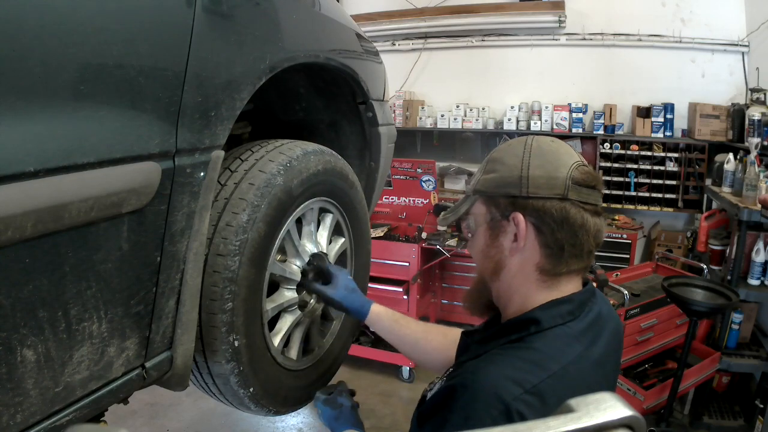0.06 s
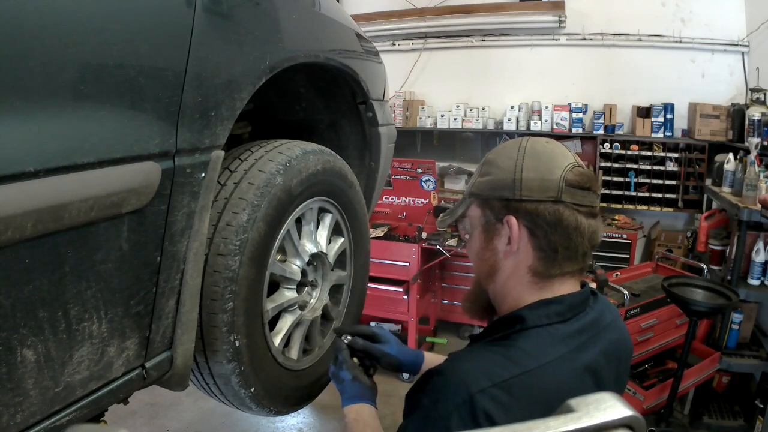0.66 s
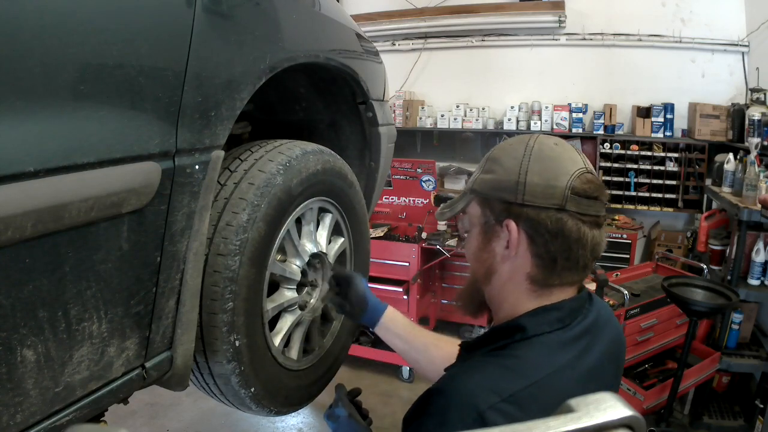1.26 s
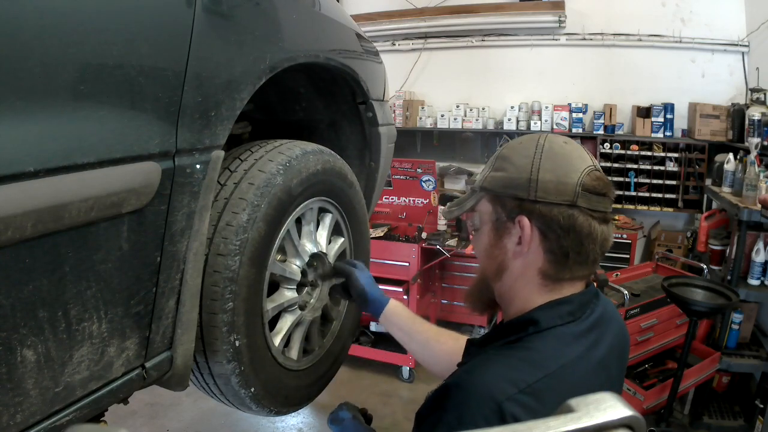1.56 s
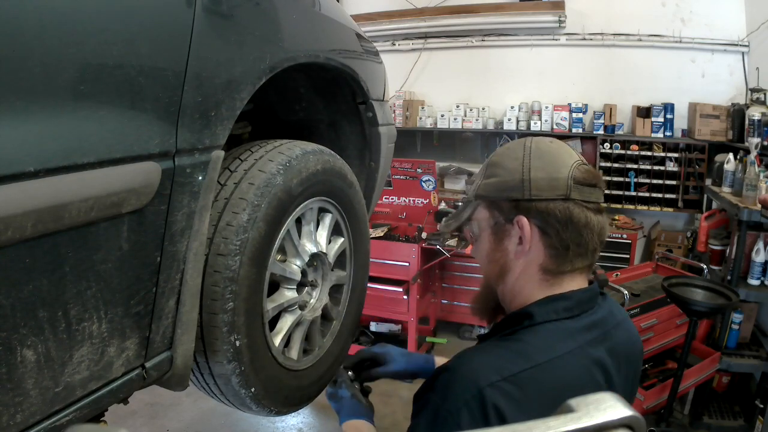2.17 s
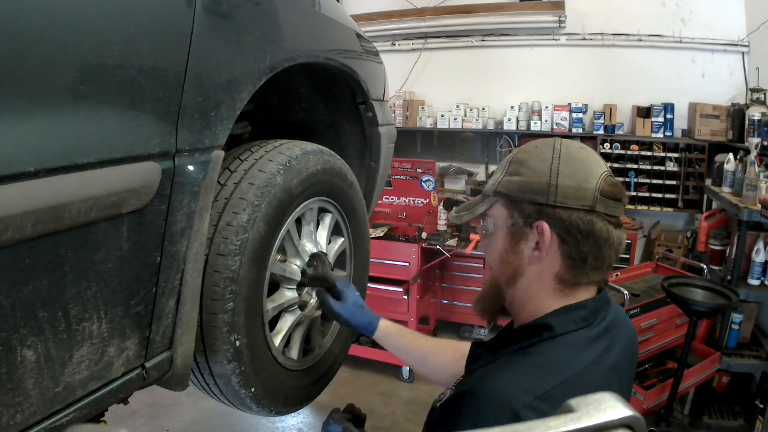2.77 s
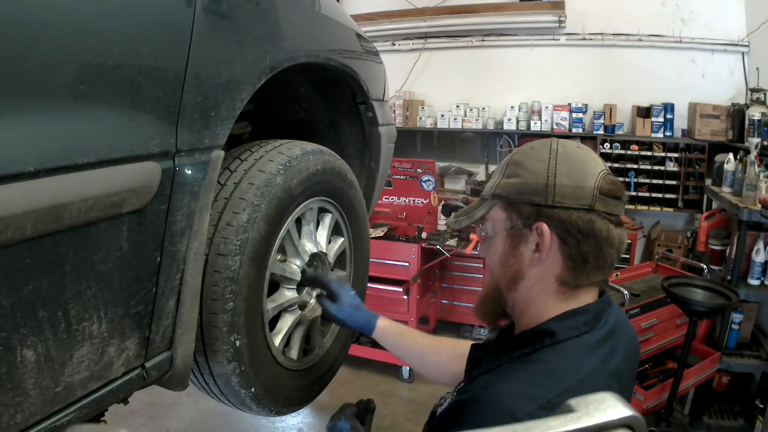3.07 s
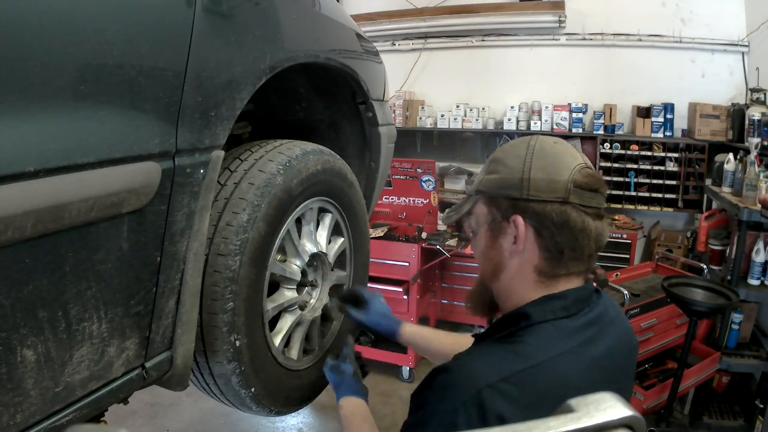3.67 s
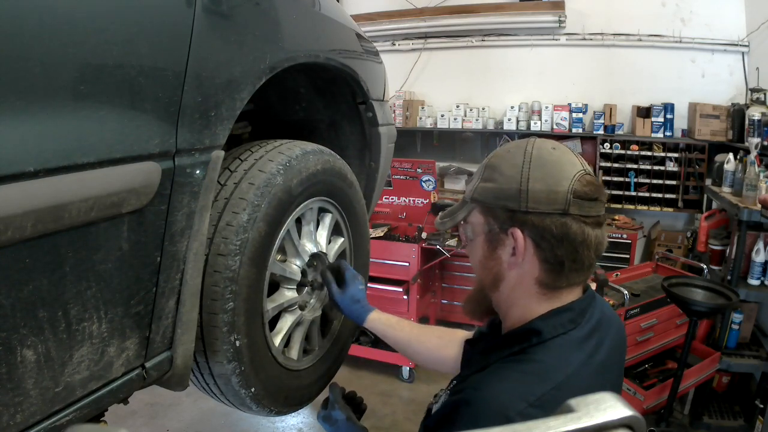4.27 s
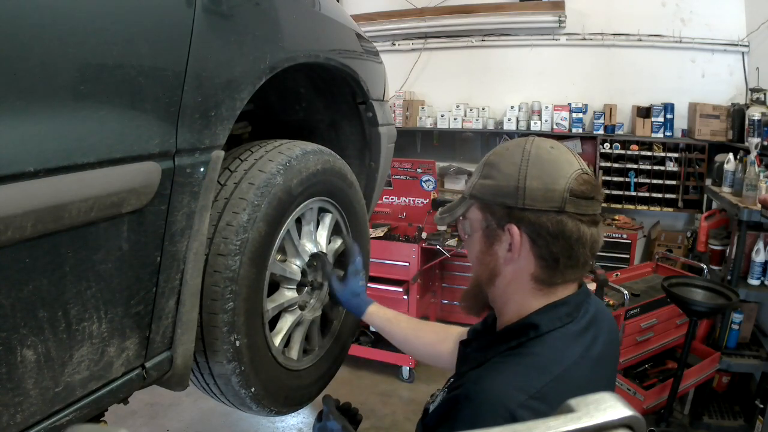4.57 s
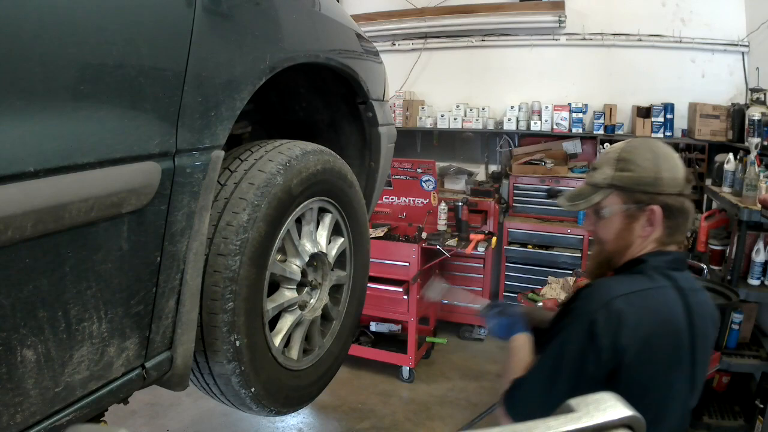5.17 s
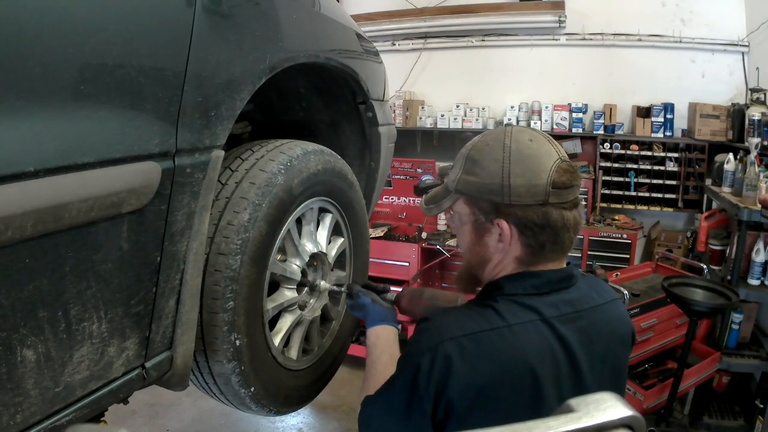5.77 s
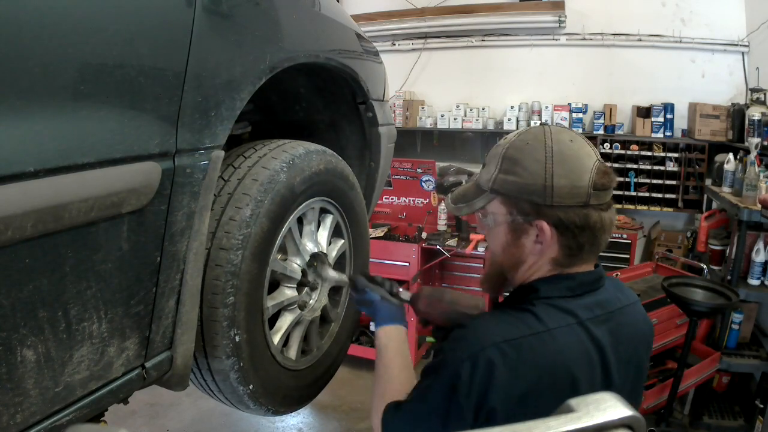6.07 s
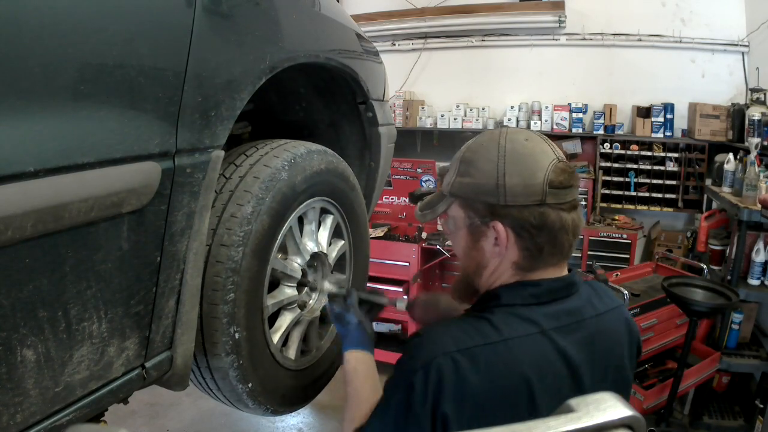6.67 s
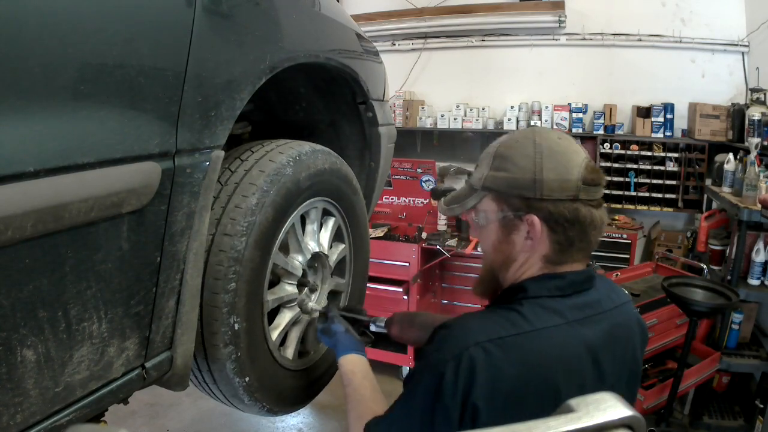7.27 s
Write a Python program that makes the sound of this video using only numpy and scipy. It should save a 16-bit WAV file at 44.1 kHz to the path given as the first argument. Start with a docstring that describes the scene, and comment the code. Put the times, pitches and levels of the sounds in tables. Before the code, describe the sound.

In a garage with a low background rumble, gloves rustle and steel lug nuts click, ring and scrape softly as they are threaded onto a car wheel by hand. The sound cuts out for an instant. A socket then clacks on and an air impact wrench fires five short, loud bursts of hammering, hiss and whine, with metal knocks between them. The tyre booms, the hard room echoes briefly and the close microphone overloads.

```python
"""Gloves rustle and steel clicks softly over a garage's low rumble: lug nuts go onto a car wheel by hand.
Each nut scrapes along its thread and ticks on its stud. The sound drops out for an instant; then a socket
clacks on and an air impact wrench fires five short bursts of hammer blows, exhaust and motor whine.
The blows ring socket and wheel, the tyre booms, the hard room answers and the close microphone overloads."""
import sys
import numpy as np
from scipy import signal
from scipy.fft import rfft, irfft
from scipy.io import wavfile
from scipy.ndimage import uniform_filter1d, map_coordinates

SR = 44100
rng = np.random.default_rng(int(sys.argv[2]) if len(sys.argv) > 2 else 0)


def digitize_waveform(pressure):
    """Quantize a signal to 16-bit integers and store it at the path in sys.argv[1].

    Rows of a 2-D input are taken as channels; values are limited to [-1, 1].
    """
    field = np.atleast_2d(pressure).T
    bounded = np.clip(field, -1, 1)
    quanta = np.round(bounded * 32767).astype(np.int16)
    wavfile.write(sys.argv[1], SR, quanta)


N = 322371
TIME = np.arange(N) / SR
CONTACT_RISE_S = .003

# trigger pulls: t/s, length/s, hammer/dB, wheel ring/dB, exhaust/dB, whine/Hz, whine/dB
TRIGGER_PULLS = [(5.577, 0.047, -1.5, -8.5, -1.5, 2426, -6), (5.683, 0.024, -3, -11.5, -5, 3734, -9),
                 (5.845, 0.063, 3, -16, -3.5, 2131, -7.5), (6.466, .082, -0.5, -19.5, -6, 3465, -14.5),
                 (7.126, 0.1, 1.5, -12.5, -5, 2151, -11)]
# the socket hits nuts and rim: t/s, clack/dB, knock/dB, hollow bore/dB, nut ring/dB
SOCKET_HITS = [(5.343, -22.5, -57, -24, -15.5), (5.474, -14, -57, -23, -6.5), (6.0825, -4, -18.5, -38, -36),
               (6.204, -25.5, -25.5, -49, -52), (6.3931, -14.5, -18, -28.5, -43),
               (6.7138, -13.5, -24.5, -46, -16), (6.9519, -34, -33.5, -48.5, -60),
               (7.0043, -28.5, -41, -35, -48), (7.035, -20, -24, -27, -43)]
# spectrum of the socket's steel-on-steel clack: f/Hz, level/dB
CLACK_SPECTRUM = [(200, 7.5), (1200, 9.5), (1800, 4), (2500, 7), (3500, 7), (4600, 2.5), (7000, -4.5),
                  (9500, -20), (13000, -74.5)]
# modes of a lug nut: f/Hz, t60/s, level/dB
LUG_NUT_MODES = [(2060, .2, -9.5), (2740, .12, -15), (3115, .25, 0), (3160, .22, -3), (3930, .14, -17),
                 (6874, .12, -23)]
# low rumble of shop and wheel: f/Hz, level/dB
RUMBLE_SPECTRUM = [(12, -27.5), (20, -4), (65, 3.5), (97, -4.5), (134, -0.5), (166, -11.5), (196, -14.5),
                   (264, -15.5), (296, -12.5), (400, -19), (520, -37.5), (880, -120)]


def amp(db):
    """Decibels to gain."""
    return 10 ** (np.asarray(db) / 20)


def unit(x):
    """Scale to rms 1."""
    return x / np.sqrt(np.mean(x ** 2) + 1e-20)


def fade(t, t60):
    """Exponential decay, 60 dB down after t60."""
    return np.exp(-np.log(1000) * t / np.maximum(t60, 1e-3))


def swell(start, attack, hold, t60):
    """An envelope that ramps up from start and begins to die away hold seconds after start."""
    t = TIME - start
    return np.clip(t / attack, 0, 1) * fade(np.maximum(t - hold, 0), t60)


def wobble(rate):
    """A smooth random curve with rate knots a second."""
    return map_coordinates(rng.standard_normal(int(N * rate / SR) + 4), [TIME * rate])


def along(points, hz):
    """Read (f/Hz, value) points on a log frequency axis."""
    freqs, values = np.transpose(points)
    return np.interp(np.log(hz + 1), np.log(freqs), values)


def add(track, start, x):
    """Mix x into the track from start seconds on."""
    part = track[round(start * SR):][:len(x)]
    part += x[:len(part)]


def colour(x, spectrum, size=2048):
    """Minimum-phase EQ under which white noise keeps its power."""
    gain = amp(along(spectrum, np.fft.rfftfreq(size, 1 / SR)))
    cepstrum = irfft(np.log(gain))
    cepstrum[1:size // 2] *= 2  # folding the cepstrum makes the filter causal
    cepstrum[size // 2 + 1:] = 0
    impulse = irfft(np.exp(rfft(cepstrum)))
    return signal.fftconvolve(x, impulse / np.linalg.norm(impulse))[:len(x)]


def noise(spectrum):
    """Steady coloured noise of rms 1."""
    return unit(colour(rng.standard_normal(N), spectrum))


def ring(modes, t):
    """Decaying modes at slightly varied strengths and fresh phases, starting near rms 1."""
    hz, t60, db = np.transpose(modes)[:, :, None]
    gain = amp(db + 1.5 * rng.standard_normal(db.shape))
    phase = 2 * np.pi * (hz * t + rng.random(db.shape))
    return np.sum(gain * fade(t, t60) * np.sin(phase), 0) / np.sqrt(np.sum(gain ** 2) / 2)


def crack(t, t60, spectrum, rise=CONTACT_RISE_S):
    """A hard contact: a burst of coloured noise with a fast attack and an exponential tail."""
    return colour(rng.standard_normal(len(t)) * fade(t, t60) * (1 - np.exp(-t / rise)), spectrum)


def rubbed(friction, modes):
    """Friction noise sings in the modes of a body."""
    body = ring(modes, np.arange(SR // 3) / SR)
    return signal.fftconvolve(friction, body / np.linalg.norm(body))[:len(friction)]


def in_garage(x, wet_db):
    """The direct sound plus the hard room's diffuse tail, which builds within milliseconds."""
    # reverb time of the garage: f/Hz, t60/s
    decay_times = [(70, 0.95), (200, 0.26), (800, 0.28), (3000, 0.34), (7000, 0.33), (12000, 0.53)]
    hz, t, bands = signal.stft(rng.standard_normal(SR * 3 // 4), SR, nperseg=256)
    envelope = fade(t, along(decay_times, hz)[:, None]) * (1 - np.exp(-t / .0011))
    room = signal.istft(bands * envelope, SR, nperseg=256)[1]
    room *= amp(wet_db) / np.linalg.norm(room)
    room[0] += 1  # direct path
    return signal.fftconvolve(x, room)


def shop_and_gloves():
    """A bed of rumble, air and hiss; each move of the hands swells it and adds grainy glove rustle."""
    # hands shift on the wheel: centre t/s, half length/s, rumble/dB, rustle/dB
    hand_moves = [(0.058, 0.055, -51, -68), (0.703, 0.044, -50, -70), (0.965, 0.027, -50, -72),
                  (2.38, 0.045, -47, -59), (3.03, 0.29, -51, -67), (3.168, 0.048, -39.5, -61.5),
                  (4.0, 0.18, -53, -63), (4.924, 0.15, -51.5, -56), (5.365, 0.053, -50, -45.5),
                  (5.56, 0.11, -40, -70)]
    # glove rustle, also the colour of the faint hiss: f/Hz, level/dB
    glove_spectrum = [(800, -25), (2000, 2), (3500, 3.5), (6000, -5), (8500, -15), (11000, -19.5),
                      (15000, -32)]
    # air in the shop: f/Hz, level/dB
    air_spectrum = [(120, -41), (200, -2), (265, -12.5), (292, -8), (646, -10), (779, -14.5), (1230, -16.5),
                    (1610, -20), (2260, -22), (5000, -54.5), (6500, -59), (11000, -120)]
    floor_db, air_db, hiss_db = -56, -62.5, -72.5  # the shop at rest
    air_follows = .24  # dB of stirred air per dB of rumble
    rumble_power, rustle_power = amp(floor_db) ** 2, 0
    for centre, width, rumble_db, rustle_db in hand_moves:
        move = np.exp(-((TIME - centre) / width) ** 2)
        rumble_power += amp(rumble_db) ** 2 * move
        rustle_power += amp(rustle_db) ** 2 * move
    rumble_gain = np.sqrt(rumble_power)
    air_gain = amp(air_db + .59 * wobble(3.9)) * (rumble_gain / amp(floor_db)) ** air_follows
    grain = unit(amp(2 * wobble(110) + 1.2 * wobble(25)))
    gloves = np.sqrt(rustle_power) * grain * noise(glove_spectrum)
    bed = rumble_gain * noise(RUMBLE_SPECTRUM) + air_gain * noise(air_spectrum)
    return bed + amp(hiss_db) * noise(glove_spectrum) + gloves


def thread_scrape():
    """Spun by the fingers, a nut scrapes unevenly along its thread, ever softer as it slows."""
    # spins of a nut: t/s, length/s, level/dB
    spins = [(0.0, 0.75, -65.5), (2.785, 0.61, -64)]
    # modes of stud and rim: f/Hz, t60/s, level/dB
    stud_modes = [(1102, 0.1, 0.5), (1300, 0.095, -9), (1403, 0.097, -7.5), (707, 0.086, -4.5)]
    slowing_db_per_s = 10.5
    envelope = np.zeros(N)
    for start, length, db in spins:
        gain = amp(db - slowing_db_per_s * np.maximum(TIME - start, 0))
        envelope += gain * swell(start, attack=.053, hold=length, t60=.05)
    roughness = amp(.98 * wobble(30.57))
    return rubbed(envelope * roughness * rng.standard_normal(N), stud_modes)


def squeak_and_knock():
    """A short, low glove squeak and later a small pitched knock: brief tones that sag in pitch."""
    # the squeak, then the knock: t/s, starting f/Hz, pitch fall rate/(1/s), level/dB
    blips = [(2.319, 597, 7.4, -37), (4.956, 576, 2.6, -47.5)]
    out, t = np.zeros(N), np.arange(SR // 16) / SR
    envelope = np.exp(-((t - .017) / .0055) ** 2)
    for start, hz, fall, db in blips:
        tone = np.sin(2 * np.pi * np.cumsum(hz * np.exp(-fall * t)) / SR)
        add(out, start, in_garage(amp(db) * tone * envelope, wet_db=-2.5))
    return out


def nut_clicks():
    """Each nut rattles briefly on its stud and leaves a thin ring; harder taps tick more brightly."""
    # nuts are set on their studs, then click at each turn: t/s, rattle/dB, ring/dB
    clicks = [(0.878, -51, -57), (0.9073, -41, -43), (0.927, -36.5, -51), (1.0344, -54, -62),
              (1.05, -50.5, -52), (1.2457, -47, -52), (1.402, -49.5, -52), (1.5222, -50, -68),
              (1.635, -51, -74), (2.3837, -35.5, -36), (2.3978, -40, -50), (2.5227, -44, -50),
              (2.584, -52.5, -50), (2.7055, -52, -50.5), (2.8143, -55, -51), (2.915, -53, -58),
              (3.0054, -46, -48.5), (3.104, -43.5, -49), (3.7143, -40.5, -66), (3.8385, -34, -30.5),
              (3.978, -46, -52), (4.024, -38.5, -41.5), (4.0797, -40.5, -40), (4.13, -41, -43.5),
              (4.3347, -41, -46.5), (4.5135, -49.5, -57), (4.6237, -40.5, -45), (4.737, -44, -43.5),
              (4.8544, -41, -43), (4.94, -43, -62), (5.0836, -50, -68), (5.138, -45.5, -54)]
    # body of the rattle: f/Hz, level/dB
    tap_spectrum = [(200, -3), (750, -6.5), (1080, -2), (1400, -7), (2100, -2.5), (3000, 0.5), (4200, -8),
                    (5500, -11.5), (7500, -11.5), (13000, -37.5)]
    # its bright edge: f/Hz, level/dB
    tick_spectrum = [(2000, -44), (5000, -10), (6200, -7), (7500, 0.5), (9200, -6), (11000, -5.5),
                     (13000, -37)]
    middling_db, tick_slope, rattle_t60 = -43.5, 2.6, .057  # slope: dB of tick per dB of rattle
    out, t = np.zeros(N), np.arange(SR // 4) / SR
    attack = 1 - np.exp(-t / CONTACT_RISE_S)
    for start, rattle_db, ring_db in clicks:
        tick_db = -61.5 + tick_slope * (rattle_db - middling_db)
        rattle = amp(rattle_db - .5) * crack(t, rattle_t60, tap_spectrum)
        tick = amp(tick_db) * crack(t, rattle_t60, tick_spectrum)
        add(out, start, in_garage(rattle + tick, wet_db=3))
        add(out, start, amp(ring_db - 4.5) * ring(LUG_NUT_MODES, t) * attack)
    return out


def socket_drags():
    """The socket grinds over a nut and keeps it singing."""
    # drags of the socket: t/s, length/s, nut ring/dB, grind/dB
    drags = [(5.372, 0.13, -40.5, -42), (5.485, 0.11, -43, -42.5), (6.357, 0.042, -61.5, -48),
             (6.96, 0.079, -59, -47.5)]
    out, t = np.zeros(N), np.arange(SR // 3) / SR
    for start, length, ring_db, grind_db in drags:
        envelope = np.minimum(t / .004, 1) * fade(np.maximum(t - length, 0), t60=.083)
        friction = envelope * rng.standard_normal(len(t))
        add(out, start, amp(ring_db) * rubbed(friction, LUG_NUT_MODES))
        add(out, start, amp(grind_db) * colour(friction, CLACK_SPECTRUM))
    return out


def wheel_shake():
    """The wheel rumbles on after each burst of the wrench and each knock of the socket."""
    shakes = [amp(-33) * swell(start, attack=.037, hold=.11, t60=.5) for start, *_ in TRIGGER_PULLS]
    jolts = [amp(knock_db - 19) * swell(start, attack=.037, hold=.037, t60=.45)
             for start, _, knock_db, *_ in SOCKET_HITS]
    return np.linalg.norm(shakes + jolts, axis=0) * noise(RUMBLE_SPECTRUM)  # they add in power


def tyre_boom(start=5.644, db=-16):
    """The tyre booms when the first nut bites and jolts the wheel."""
    # modes of the air-filled tyre: f/Hz, t60/s, level/dB
    tyre_modes = [(81.1, 0.55, -7.5), (102, 0.5, -3), (123.6, 0.23, -6)]
    out, t = np.zeros(N), np.arange(SR // 2) / SR
    add(out, start, amp(db) * ring(tyre_modes, t) * (1 - np.exp(-t / .0016)))
    return out


def socket_knocks():
    """The socket goes on and comes off: a clack, a knock on the wheel, a hollow bore, a ringing nut."""
    # the bumped wheel: f/Hz, level/dB
    knock_spectrum = [(60, -14), (200, -10), (380, 0), (540, 0), (610, -4), (720, 0), (850, -11),
                      (1350, -13), (1750, -6), (2400, -22), (8000, -50)]
    # the hollow of the socket: f/Hz, level/dB
    bore_spectrum = [(600, -25), (850, -10), (960, 0), (1150, 0), (1400, -8), (1750, -7), (2300, -25),
                     (8000, -50)]
    out, t = np.zeros(N), np.arange(SR // 3) / SR
    attack = 1 - np.exp(-t / CONTACT_RISE_S)
    for start, clack_db, knock_db, bore_db, ring_db in SOCKET_HITS:
        clack = amp(clack_db + 1.5) * crack(t, .026, CLACK_SPECTRUM)
        knock = amp(knock_db) * crack(t, .084, knock_spectrum)
        bore = amp(bore_db) * crack(t, .068, bore_spectrum)
        add(out, start, in_garage(clack + knock + bore, wet_db=0))
        add(out, start, amp(ring_db - 19) * ring(LUG_NUT_MODES, t) * attack)
    return out


def impact_wrench():
    """The air motor whines up, vents its exhaust and throws the hammer at the anvil about every 18 ms."""
    # one blow of the hammer: f/Hz, level/dB
    hammer_spectrum = [(40, -16), (100, -6), (170, -5), (250, 2), (400, 7), (600, 4), (900, 7), (1500, -3),
                       (2200, 3.5), (3600, -6), (4800, -5.5), (7500, -8.5), (10000, -28), (14000, -28.5)]
    # socket and wheel ringing under the blows: f/Hz, t60/s, level/dB
    wheel_modes = [(248.4, 0.13, -21.5), (368, 0.22, -10.5), (447.4, 0.15, -2.5), (740.2, 0.1, 8),
                   (961, 0.18, -0.5), (1104, 0.062, -20.5), (1329, 0.06, 5), (1390, 0.058, 1),
                   (2100, 0.13, 3), (2230, 0.39, -5), (2670, 0.15, -14), (3120, 0.33, -19),
                   (3420, 0.33, -4), (3770, 0.12, -16.5), (4150, 0.14, -24.5)]
    # rush of exhaust air: f/Hz, level/dB
    exhaust_spectrum = [(60, -19.5), (500, -3.5), (1500, -1.5), (2300, 3.5), (3700, 5), (4800, -4),
                        (7500, -13.5), (10000, -37.5), (14000, -32.5)]
    blows_per_s, air_lead_s = 55.5, .012  # air flows just before the first blow
    out, t = np.zeros(N), np.arange(SR // 2) / SR
    strike = lambda: crack(t, .057, hammer_spectrum, rise=.0026)
    for start, length, hammer_db, ring_db, exhaust_db, whine_hz, whine_db in TRIGGER_PULLS:
        tool = np.zeros(len(t))
        # on one nut the blows sound half alike, which gives the burst its low buzz
        repeated, wheel = strike(), ring(wheel_modes, t)
        for when in np.arange(0, length, 1 / blows_per_s):
            jitter_s, gain_db = rng.normal(0, [.0001, 1])
            blow = amp(hammer_db - 2) * (repeated + strike()) + amp(ring_db) * wheel
            add(tool, air_lead_s + when + jitter_s, amp(gain_db) * blow)
        valve = np.minimum(t / .025, 1) ** 2 * fade(np.maximum(t - air_lead_s - length, 0), t60=.055)
        # the rotor gathers speed, is checked by every blow and shudders
        shudder = .025 * np.sin(2 * np.pi * blows_per_s * t) + .04 * wobble(300)[:len(t)]
        speed = (1 - np.exp(-t / .0072)) * (1 + shudder)
        whine = np.sin(2 * np.pi * np.cumsum(whine_hz * speed) / SR)
        exhaust = colour(rng.standard_normal(len(t)), exhaust_spectrum)
        tool += valve * (amp(exhaust_db) * exhaust + amp(whine_db) * whine)
        add(out, start - air_lead_s, in_garage(tool, wet_db=-2))
    return out


def scene():
    """Quiet handwork, loud tool work and the shop's bed, mixed in mono."""
    handwork = nut_clicks() + thread_scrape() + squeak_and_knock()
    toolwork = socket_knocks() + socket_drags() + impact_wrench() + tyre_boom() + wheel_shake()
    return (handwork + toolwork + shop_and_gloves())[None]


def record(dry):
    """The microphone overloads, the treble rolls off, the sound drops out briefly and peaks clip."""
    # treble response of the microphone, of which only the cuts apply: f/Hz, level/dB
    mic_response = [(7500, 3.5), (9400, -2), (10500, -8.5), (12000, -18), (12900, -43), (16000, -45)]
    ceiling, hardness, top_hz = .95, 8, 15800
    saturated = dry[0] / (1 + np.abs(dry[0] / ceiling) ** hardness) ** (1 / hardness)
    hz = np.fft.rfftfreq(2 * N, 1 / SR)
    roll_off = amp(np.minimum(along(mic_response, hz), 0))
    dulled = irfft(rfft(saturated, 2 * N) * roll_off)[:N]
    dropout = uniform_filter1d(1.0 * ((TIME > 5.002) & (TIME < 5.05)), size=64)
    clipped = np.clip(dulled * (1 - dropout), -1, 1)
    band_limit = np.clip((top_hz - hz) / 500, 0, 1) ** 2
    return irfft(rfft(clipped, 2 * N) * band_limit)[None, :N]


dry = scene()
out = record(dry)
digitize_waveform(out)
```